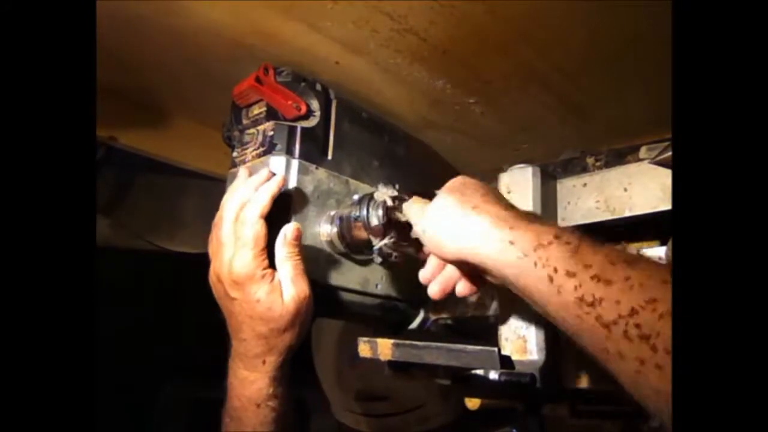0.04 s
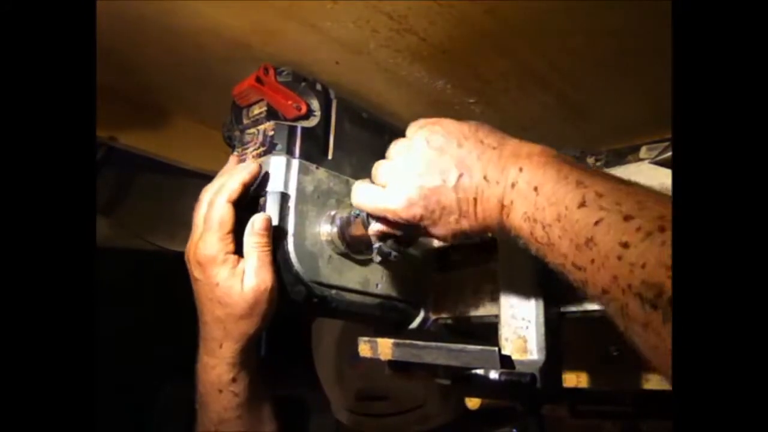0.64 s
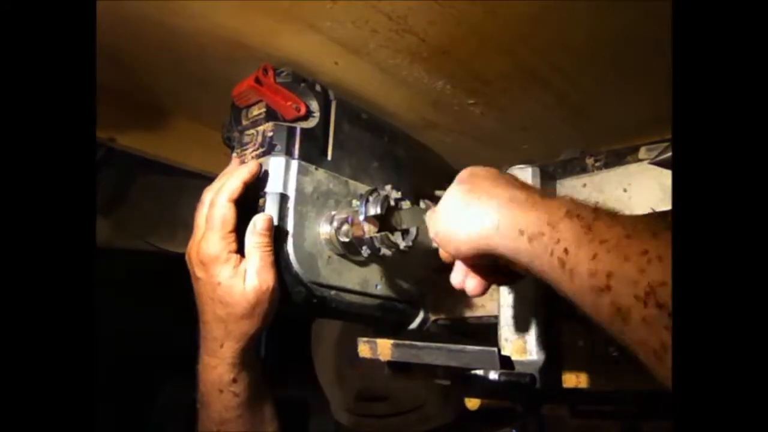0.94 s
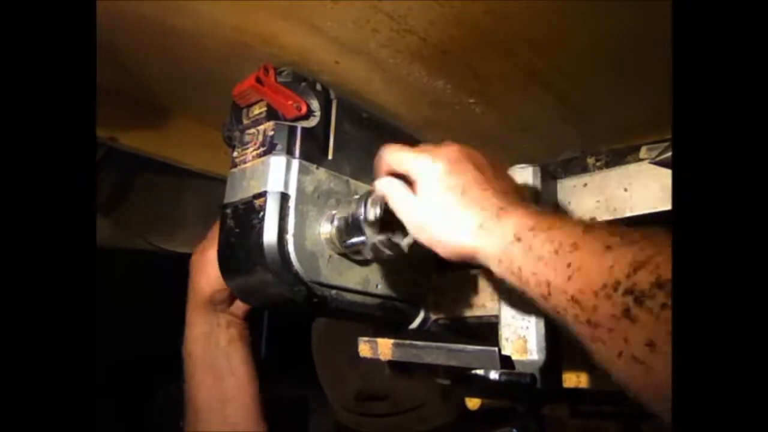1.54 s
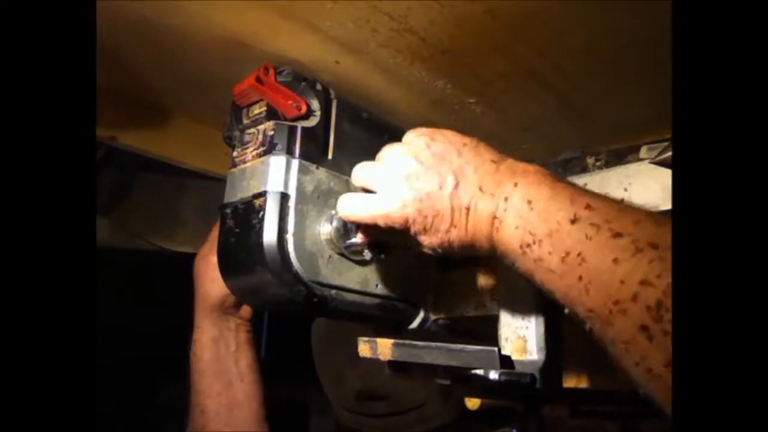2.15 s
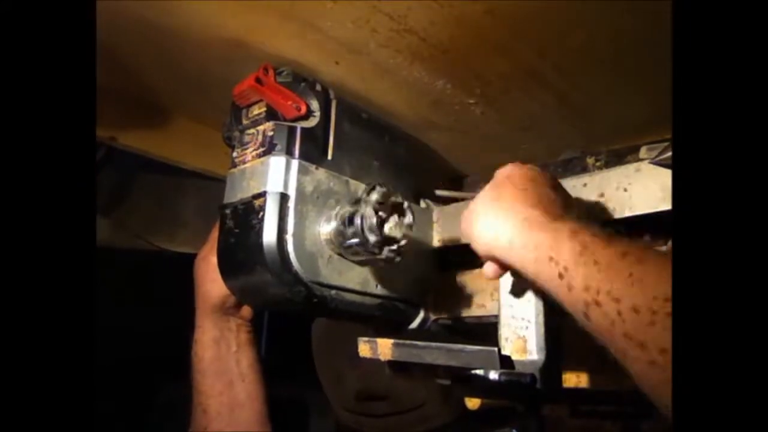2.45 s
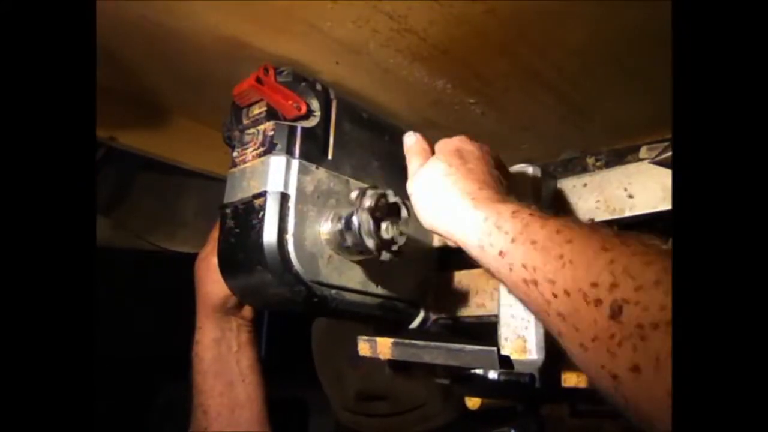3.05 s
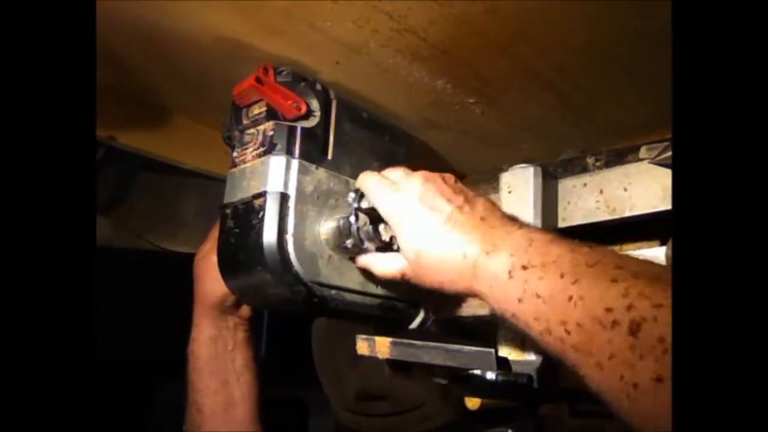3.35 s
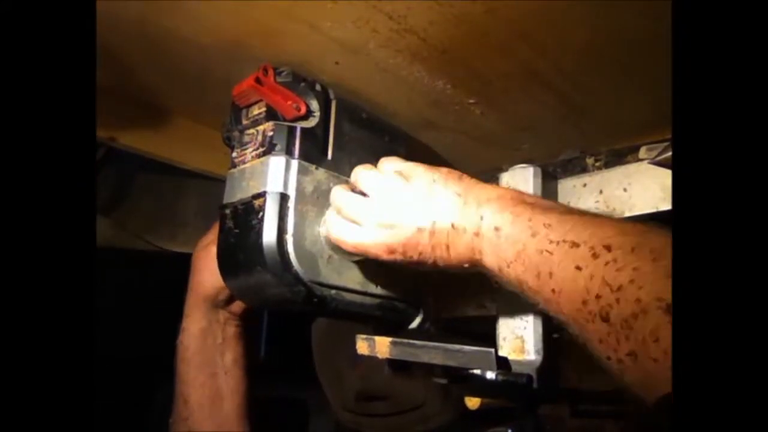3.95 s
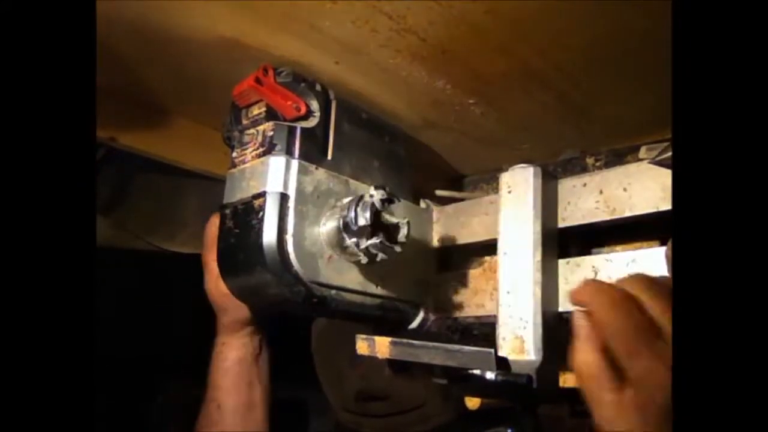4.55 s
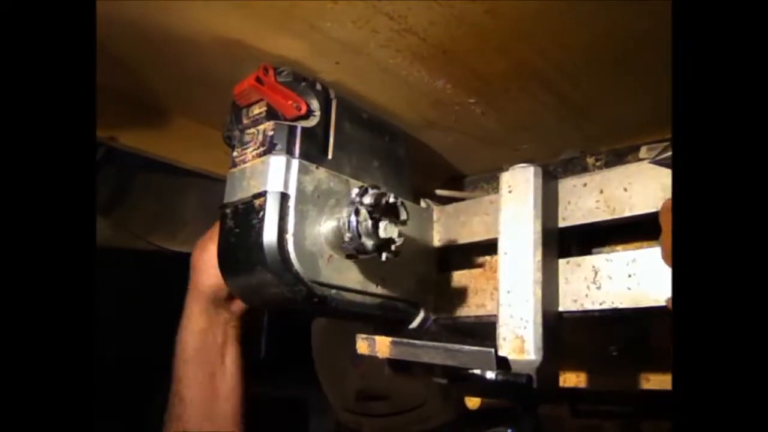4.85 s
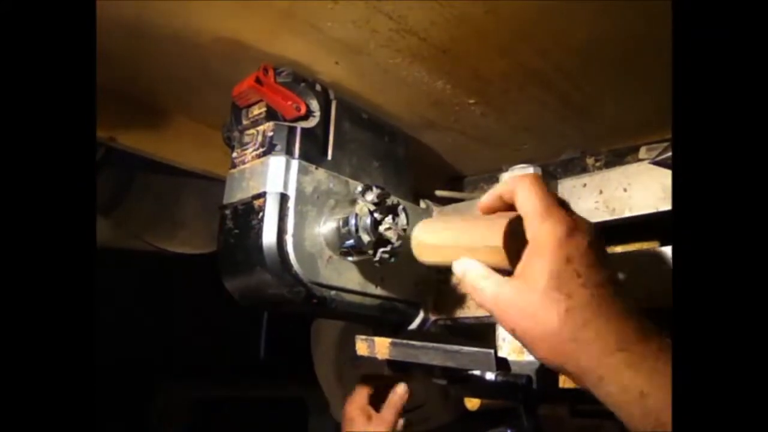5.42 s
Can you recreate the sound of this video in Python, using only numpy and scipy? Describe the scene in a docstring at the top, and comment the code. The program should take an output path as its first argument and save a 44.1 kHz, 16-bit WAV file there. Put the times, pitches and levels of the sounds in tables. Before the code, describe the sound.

Small steel clinks and short rattling spins of a lathe chuck turned by hand, ending in one hard metal knock over a low workshop hum.

```python
"""A workshop hums, and steel clinks as a small lathe chuck is spun along its spindle by hand.
At each flick the thread rumbles and whistles faintly, and the loose jaws rattle. The hand catches
the chuck with dull thumps, and fingers hiss over the steel. Running tight, the chuck judders by
stick-slip friction, then knocks hard against the headstock, whose casting rings in its modes.
An automatic gain control ducks at that knock and creeps back."""
import sys
import numpy as np
from scipy import signal
from scipy.fft import rfft, irfft, next_fast_len
from scipy.io import wavfile

SR = 44100
rng = np.random.default_rng(int(sys.argv[2]) if len(sys.argv) > 2 else 0)


def log_audio(samples):
    """Write samples as a 16-bit WAV file to the path given in sys.argv[1]."""
    # one column per channel
    frames = np.atleast_2d(samples).T
    # limit to full scale, then quantise
    limited = np.clip(frames, -1, 1)
    pcm = np.round(limited * 32767).astype(np.int16)
    wavfile.write(sys.argv[1], SR, pcm)


N = 250488
TIME = np.arange(N) / SR
RING_TIME = TIME[:16384]


def amp(db):
    """Decibels to amplitude ratio."""
    return 10 ** (np.asarray(db) / 20)


def unit(x):
    """Normalisation to rms 1."""
    return x / np.sqrt(np.mean(x ** 2))


def white(size):
    """White noise of rms 1: a flat spectrum with random phases."""
    return unit(irfft(np.exp(2j * np.pi * rng.random(size // 2 + 1)), size))


def colour(x, points, peaks=()):
    """Minimum-phase filter of power gain 1, from (Hz, dB) points and (Hz, width Hz, dB) resonances."""
    size = next_fast_len(len(x) + 4096)
    freqs = np.linspace(0, SR / 2, size + 1) + 1
    hz, db = np.transpose(points)
    shape_db = np.interp(np.log(freqs), np.log(hz), db)
    for centre, width, height in peaks:
        shape_db += height / (1 + (2 * (freqs - centre) / width) ** 4)
    cepstrum = irfft(np.log(unit(amp(shape_db))))[:size]
    cepstrum[1:] *= 2  # folding the cepstrum makes the filter causal
    return irfft(rfft(x, 2 * size) * np.exp(rfft(cepstrum, 2 * size)))[:len(x)]


def noise(points, size, peaks=()):
    """Stationary coloured noise."""
    return colour(white(size), points, peaks)


def burst(envelope):
    """Modal overlap: unresolved modes merge into noise under one envelope."""
    return white(len(envelope)) * envelope


def fade(t60, hold=0):
    """Exponential damping: steady for hold seconds, then 60 dB down in t60 seconds."""
    return np.exp(-np.log(1000) * np.maximum(RING_TIME - hold, 0) / t60)


def smooth(x, seconds):
    """First-order low-pass with the given time constant."""
    pole = np.exp(-1 / (seconds * SR))
    return signal.lfilter([1 - pole], [1, -pole], x)


def wander(rate):
    """Random modulation with a spread near 1, through rate new values a second."""
    knots = rng.standard_normal(N // 100)
    return np.interp(TIME * rate, np.arange(len(knots)), knots)


# Spectrum of the workshop air. Each row: frequency in Hz, relative level in dB.
AIR_SPECTRUM = [(30, -13.5), (85, -15.5), (114, -9), (202, -2.5), (256, -8.5), (332, -5), (432, -11.5),
                (639, -7.5), (1050, -6.5), (1450, -12.5), (8720, -33), (11500, -46.5), (15500, -65.5)]
# Broad peaks and dips in it. Each row: centre in Hz, width in Hz, gain in dB.
AIR_RESONANCES = [(167, 68, 3.5), (337, 60, 3), (756, 150, -7), (1172, 70, 6.5), (2170, 300, 2.5),
                  (4030, 1400, 1), (5260, 1800, -8), (8200, 2500, -3.5)]
AIR_DB, HUM_HZ, HUM_DB = -47, 119.6, -57

def workshop():
    """Ambient noise: a broadband rush of air and a mains hum, both slightly modulated."""
    air = noise(AIR_SPECTRUM, N, AIR_RESONANCES) * amp(AIR_DB + 0.84 * wander(3.5))
    hum = np.sqrt(2) * np.sin(2 * np.pi * HUM_HZ * TIME + .25 * wander(7))
    return air + hum * amp(HUM_DB + 0.73 * wander(10))


def add(track, start, sound):
    """Superposition: a sound joins the track at start seconds."""
    first = max(int(start * SR), 0)
    track[first:first + len(sound)] += sound[:N - first]


def loose_mode(hz, t60, contact, chatter_rad=.55):
    """A loose part's mode builds up during contact, then decays; chatter modulates its phase."""
    shake = unit(smooth(smooth(white(len(RING_TIME)), 0.00045), 0.00045))
    swell = np.minimum(RING_TIME / contact, 1)
    decay = fade(t60, contact) + amp(-22) * fade(0.22)
    return 0.75 * swell * decay * np.sin(2 * np.pi * hz * RING_TIME + chatter_rad * shake)


# Light contacts on the chuck. Each row: start in seconds, tick level in dB, ring level in dB, part hit.
CONTACTS = [(.0423, -46, -36, "jaw tip"), (.046, -56, -38.5, "jaw"), (.061, -62, -41, "jaw"),
            (.215, -70, -59, "jaw"), (.3238, -55, -33.5, "jaw"), (.357, -56, -44, "whole"),
            (.391, -63, -51, "body"), (.551, -66, -37, "sleeve"), (.833, -66, -46, "whole"),
            (.945, -47, -46, "whole"), (1.0127, -59, -53, "jaw tip"), (1.446, -56, -62, "jaw tip"),
            (1.5176, -60, -55, "jaw tip"), (1.666, -45.5, -38, "sleeve"), (1.729, -56, -45, "body"),
            (1.776, -57, -47, "body"), (2.118, -55.5, -63, "jaw"), (2.3827, -57, -47, "whole"),
            (2.5966, -57, -52, "jaw"), (2.8177, -56, -64, "jaw"), (2.8696, -58, -56, "body"),
            (2.888, -57, -50.5, "jaw tip"), (2.9568, -58, -62, "jaw tip"), (3.0456, -53.5, -45, "body"),
            (3.0757, -38, -51, "jaw"), (3.330, -78, -43.5, "body"), (3.35, -44, -34, "whole"),
            (3.361, -41, -28.5, "body"), (3.37, -39.5, -30.5, "whole"), (3.5618, -62, -48, "body"),
            (3.6074, -50.5, -52, "body"), (3.6719, -48, -38, "sleeve"), (3.735, -73, -44, "sleeve"),
            (3.8935, -40, -41, "whole"), (5.1432, -72, -38, "sleeve")]
# How a touch on each part spreads. Each row: gains in dB of the body, the sleeve, the low jaw modes
# and the high jaw mode, then contact time in seconds.
PART_COUPLING = {"body": (0, -17, -22, -32, .0035), "sleeve": (-8, 0, -17, -30, .0028),
                 "jaw": (-10, -24, 0, -25, .003), "jaw tip": (-5, -13, -14, 0, .0035),
                 "whole": (0, -2, -2, -24, .006)}
# Spectra of a steel contact and of the chuck body. Each row: frequency in Hz, relative level in dB.
CRACK_SPECTRUM = [(800, -12), (2700, -9), (3700, 4.5), (5100, -10), (6800, -3.5), (8300, -7.5),
                  (10300, -16.5), (12000, -25.5), (13500, -38), (15500, -52)]
BODY_SPECTRUM = [(60, -42), (150, -16.5), (400, 2), (750, -5.5), (1250, 0), (1800, -3.5), (2200, -2.5),
                 (2900, -13.5), (3900, -14.5), (5000, -25), (12000, -60)]
# Resonances of the body. Each row: centre in Hz, width in Hz, gain in dB.
BODY_RESONANCES = [(597, 84, 2.7), (1090, 87, 7.1), (1435, 63, 3.4), (2630, 180, 5.9), (3943, 230, 8.2)]

def clinks():
    """Impact excitation: brief contacts tick and ring body, sleeve and jaws; the room adds a tail."""
    ticks, body, rings = np.zeros((3, N))
    onset = 1 - fade(0.0035)
    room_tail = amp(-8) * fade(0.11)
    for start, tick_db, ring_db, part in CONTACTS:
        body_db, sleeve_db, low_db, high_db, contact = PART_COUPLING[part]
        add(ticks, start, amp(tick_db) * burst(onset * (fade(0.039, contact) + room_tail)))
        add(body, start, amp(ring_db + body_db) * burst(onset * (fade(0.12, contact) + room_tail)))
        sleeve = loose_mode(2190, 0.078, contact, chatter_rad=0.17)
        sleeve += amp(1) * loose_mode(1970, 0.059, contact, chatter_rad=0.64)
        low_jaw = loose_mode(6490, 0.042, contact) + amp(-1.5) * loose_mode(3450, 0.026, contact)
        high_jaw = loose_mode(10090, 0.027, contact)
        modes = amp(sleeve_db) * sleeve + amp(low_db) * low_jaw + amp(high_db) * high_jaw
        add(rings, start, amp(ring_db) * modes)
    return colour(ticks, CRACK_SPECTRUM) + colour(body, BODY_SPECTRUM, BODY_RESONANCES) + rings


def stroke(start, length, rise_db_per_s, fall_db_per_s):
    """Envelope of a hand movement: exponential growth up to start, a hold, then exponential decay."""
    before = np.maximum(start - TIME, 0)
    after = np.maximum(TIME - start - length, 0)
    return amp(-rise_db_per_s * before - fall_db_per_s * after)


# Flicks of the chuck. Each row: start in seconds, length of push in seconds, relative rumble level
# in dB, whistle level in dB.
FLICKS = [(.05, .02, -45, -95), (.84, .115, -41.5, -86), (1.68, .075, -42, -76), (2.425, .11, -40, -68.5),
          (3.012, .025, -38, -74), (3.09, .035, -35, -72), (3.168, .025, -37.5, -79),
          (3.69, .05, -46.5, -95)]
# Spectra of the thread and of the rattling jaws. Each row: frequency in Hz, relative level in dB.
THREAD_SPECTRUM = [(50, -62), (130, -17), (220, 0), (330, 3.5), (500, 0), (750, -4.5), (1000, -3),
                   (1750, -7), (2600, -17), (3800, -18), (5000, -32.5), (7200, -30), (10400, -42),
                   (15500, -74)]
RATTLE_SPECTRUM = [(100, -25), (330, 1), (1000, 0), (1800, 1), (2600, -14), (4000, -19), (6000, -38),
                   (12000, -60)]
SPIN_UP_DB_PER_S, COAST_DB_PER_S = 520, 175

def turning(bumps_per_s=3000, taps_per_s=90):
    """Roughness excitation: tiny bumps in the thread merge into a rumble; loose jaws tap at random."""
    bumps = (rng.random(N) < bumps_per_s / SR) * rng.choice([-1, 1], N)
    resonances = [(390, 26, 1.7), (950, 140, 2), (1460, 47, 9.6), (1810, 87, 4.6), (3900, 580, 1.2)]
    rumble = colour(unit(bumps), THREAD_SPECTRUM, resonances)
    taps = (rng.random(N) < taps_per_s / SR) * rng.standard_normal(N)
    ringing_taps = signal.fftconvolve(taps, burst(fade(t60=.03)))[:N]
    rattle = colour(unit(ringing_taps), RATTLE_SPECTRUM)
    spin = sum(amp(db) * stroke(start, length, SPIN_UP_DB_PER_S, COAST_DB_PER_S)
               for start, length, db, _ in FLICKS)
    return (rumble + amp(-6) * rattle) * spin * amp(-3.5 + 0.8 * wander(90))


def whistle(start_hz=11400, sag_hz_per_s=800):
    """Friction in the dry thread drives a narrow resonance at random; it sinks through each flick."""
    sidebands = [(20, 5), (200, 2), (500, -12), (1100, -30), (3000, -70)]  # (offset Hz, dB)
    in_phase, quadrature = noise(sidebands, N), noise(sidebands, N)
    out = np.zeros(N)
    for start, _, _, db in FLICKS:
        hz = start_hz - sag_hz_per_s * np.maximum(TIME - start, 0)
        phase = 2 * np.pi * np.cumsum(hz) / SR
        tone = in_phase * np.sin(phase) + quadrature * np.cos(phase)
        out += tone * amp(db) * stroke(start, 0, SPIN_UP_DB_PER_S, fall_db_per_s=70)
    return out


def ring(modes, scatter_db=0):
    """Free vibration as a sum of damped modes; scatter_db varies their strengths from blow to blow."""
    out = np.zeros(len(RING_TIME))
    for k, (hz, db, t60) in enumerate(modes):
        strength = (-1) ** k * amp(db + scatter_db * rng.standard_normal())
        out += strength * fade(t60) * np.sin(2 * np.pi * hz * RING_TIME)
    return out


# The hand catching the chuck. Each row: start in seconds, level in dB.
CATCHES = [(.055, -35.5), (.8031, -37), (.902, -40), (1.315, -41), (3.204, -34.5)]
# Modes of the spindle seat. Each row: frequency in Hz, level in dB, 60 dB decay time in seconds.
SEAT_MODES = [(277, 5, 0.04), (373, -4.5, 0.037), (471, -3, 0.059), (1070, -31, .03), (1450, -8.5, 0.035),
              (1600, -10, .035)]

def thumps(pushes):
    """Soft pushes excite the spindle seat's damped modes; a small part radiates little bass."""
    out = np.zeros(N)
    onset = 1 - fade(.006)
    for start, db in pushes:
        grit = amp(-11) * colour(burst(fade(0.16)), THREAD_SPECTRUM)
        add(out, start, amp(db) * (onset * ring(SEAT_MODES, scatter_db=4.5) + grit))
    return signal.sosfilt(signal.butter(2, 170, "high", fs=SR, output="sos"), out)


# Fingers sliding on steel. Each row: start in seconds, length in seconds, relative level in dB.
FINGER_SLIDES = [(.535, .09, -59), (.835, .065, -61), (1.32, .014, -55), (1.403, .02, -54.5),
                 (1.67, .075, -63), (2.42, .06, -66), (5.57, .1, -66.5)]
# Spectrum of rubbing skin. Each row: frequency in Hz, relative level in dB.
SKIN_SPECTRUM = [(1000, 5), (2200, 7), (4000, 5.5), (5200, -6), (7500, 4), (10000, -4), (13000, -13),
                 (15500, -30)]

def fingers():
    """Sliding friction: dry skin hisses unevenly over the chuck, following the finger pressure."""
    pressure = sum(amp(db) * stroke(start, length, rise_db_per_s=450, fall_db_per_s=280)
                   for start, length, db in FINGER_SLIDES)
    return noise(SKIN_SPECTRUM, N) * amp(1.6 * wander(120) + 3.0) * pressure


def judder_slips(start=3.902, gap_s=.0084, jitter_s=.0006, first_db=-32, growth_db=.8):
    """Stick-slip: the tightening chuck gives nearly periodic, growing pushes, as (seconds, dB)."""
    return [(start + k * gap_s + jitter_s * rng.standard_normal(), first_db + k * growth_db)
            for k in range(5)]


# Blows of steel on the headstock. Each row: start in seconds, level in dB, relative ring level in dB,
# relative crack level in dB, low-pass cutoff in Hz.
BLOWS = [(4.164, -30.5, -5, -30, 1700), (4.183, -27, -2.5, -23, 3200), (4.1924, -13.5, -9, 5, 9050),
         (4.1957, -8.5, 2, -4, 5000), (4.2025, -17, -5, -5.5, 4960), (4.2165, -19, 2, -21.5, 2200)]
# Modes of the headstock casting. Each row: frequency in Hz, level in dB, 60 dB decay time in seconds.
CASTING_MODES = [(686, -14.5, .42), (1275, 5, .07), (1670, -13, .33), (240, -19, .19), (300, -21, .2),
                 (387, -11, .22), (474, -12, .22), (565, -11.5, .2), (772, -2, .115), (850, -13, .07),
                 (931, -11, .1), (1440, -13, .11), (1535, -12, .11), (1982, -15, .2), (2080, -14, .1),
                 (2202, -11, .13), (2323, -16, .12), (2698, -12, .11), (3480, -13, .11), (3633, -12, .11),
                 (3822, -12, .1), (4224, -16, .1), (6490, -23, .22), (10000, -28, .18)]
# Spectrum of its dense, short-lived modes. Each row: frequency in Hz, relative level in dB.
CLATTER_SPECTRUM = [(30, -29), (130, -30), (240, -7.5), (500, -2), (800, -1), (1300, 3.5), (2200, -3.5),
                    (3000, -10), (3900, -13.5), (5000, -26), (7000, -20.5), (10000, -27), (14000, -51.5)]
# Clusters of jaw modes in the crack. Each row: centre in Hz, width in Hz, gain in dB.
JAW_CLUSTERS = [(6420, 250, 2.5), (7130, 180, 0.5), (9980, 400, 9)]

def knocks():
    """Hard impacts crack, clatter and ring the casting; a softer contact excites less treble."""
    out = np.zeros(N)
    onset = 1 - fade(0.0099)
    clatter_envelope = onset * (fade(0.051, hold=0.0014) + amp(-8) * fade(0.28))
    crack_envelope = onset * (fade(0.022, hold=0.001) + amp(-15) * fade(0.19))
    for start, db, ring_db, crack_db, cutoff_hz in BLOWS:
        clatter = colour(burst(clatter_envelope), CLATTER_SPECTRUM)
        crack = colour(burst(crack_envelope), CRACK_SPECTRUM, JAW_CLUSTERS)
        ringing = amp(ring_db) * onset * ring(CASTING_MODES)
        casting = smooth(clatter + ringing, 1 / (2 * np.pi * cutoff_hz))
        add(out, start, amp(db) * (casting + amp(crack_db) * crack))
    return out


def scene():
    """Superposition of all sources at one close microphone."""
    impacts = clinks() + knocks() + thumps(CATCHES + judder_slips())
    return (impacts + turning() + whistle() + fingers() + workshop())[None]


def release(x, seconds):
    """Peak detection: instant attack, exponential release."""
    fall = np.exp(-TIME / seconds)
    return fall * np.maximum.accumulate(x / fall)


def record(dry, threshold_db=-19, bass_hz=95, top_hz=15700):
    """Automatic gain control ducks and recovers in two stages; peaks saturate, bass and top are cut."""
    pressure = dry[0]
    level_db = 10 * np.log10(smooth(pressure ** 2, .005) + 1e-12)
    over_db = np.maximum(level_db - threshold_db, 0)
    duck_db = smooth(0.47 * release(over_db, 0.45) + 0.22 * release(over_db, 2.6), 0.027)
    saturated = np.tanh(pressure * amp(-duck_db) / 1.1) * 1.1
    thinned = signal.sosfilt(signal.butter(3, bass_hz, "high", fs=SR, output="sos"), saturated)
    return signal.sosfilt(signal.ellip(8, .2, 70, top_hz, fs=SR, output="sos"), thinned)[None]


dry = scene()
out = record(dry)
log_audio(out)
```